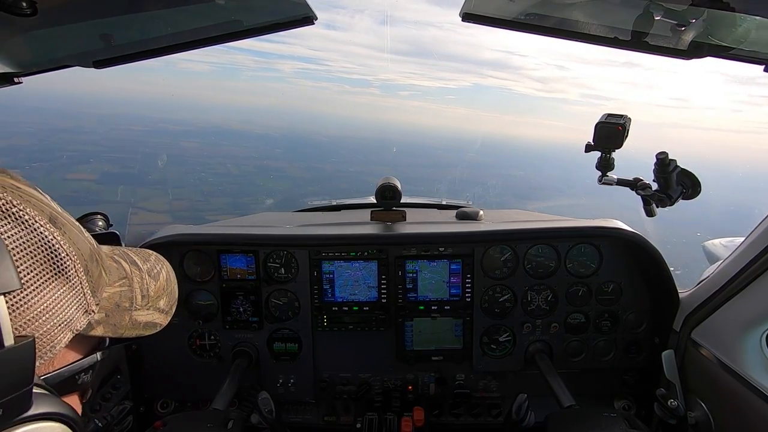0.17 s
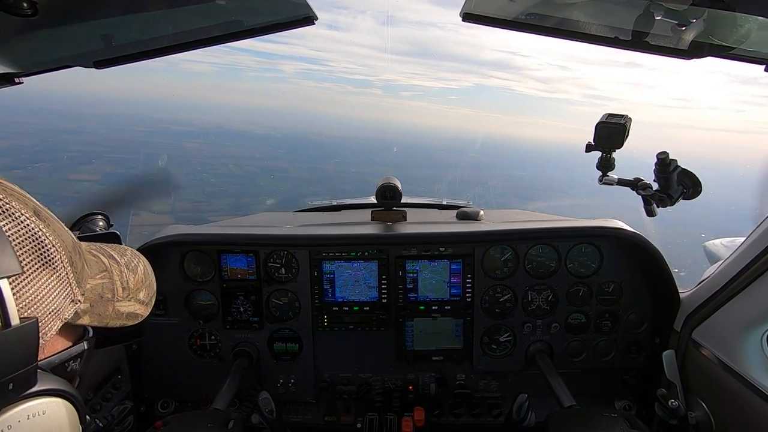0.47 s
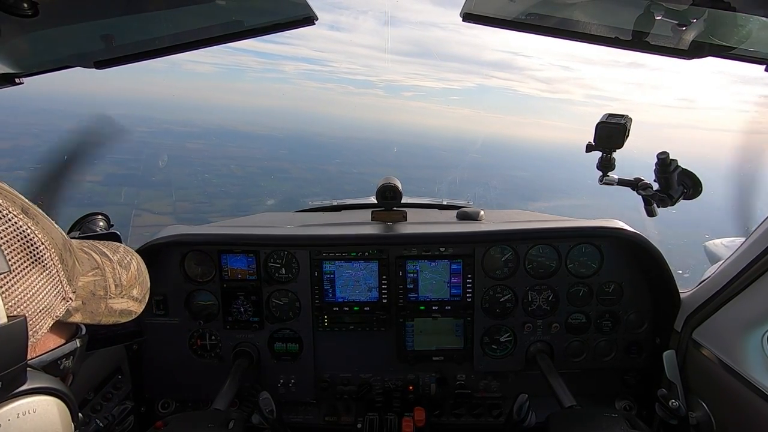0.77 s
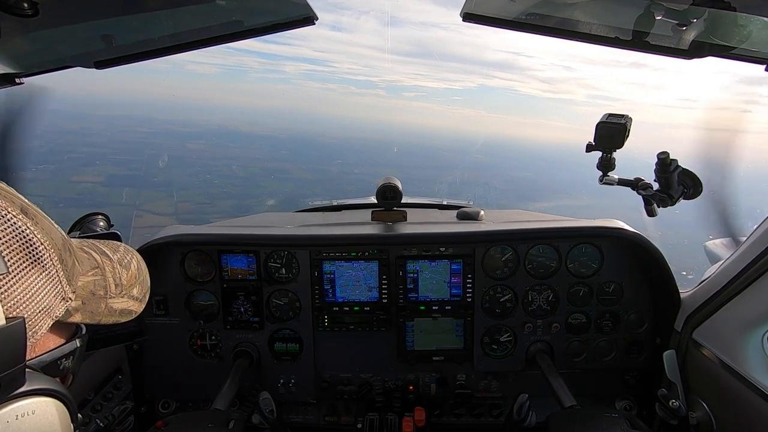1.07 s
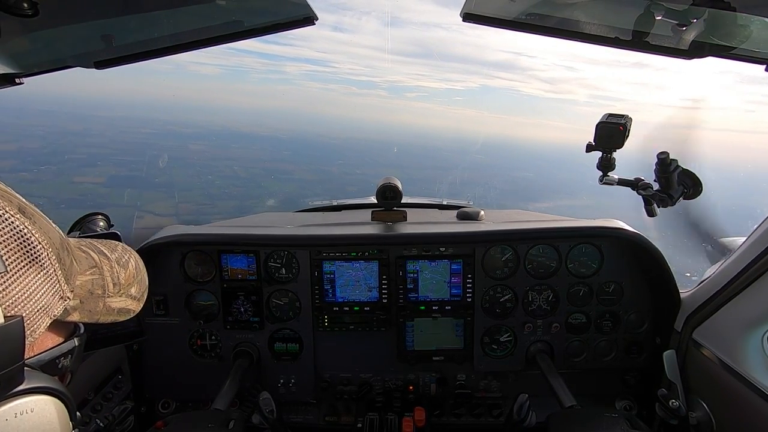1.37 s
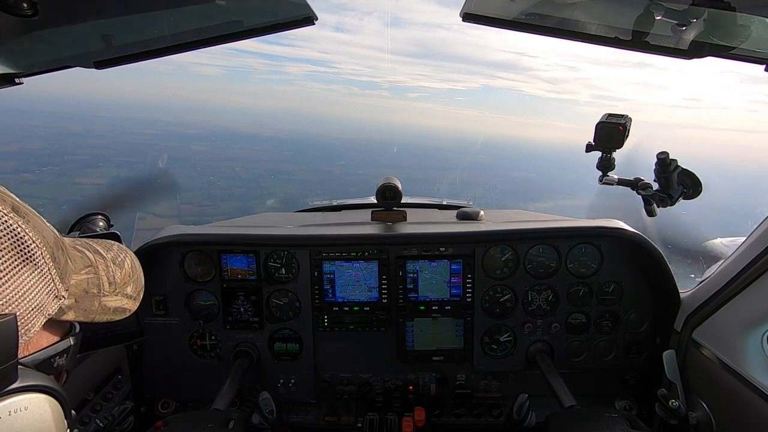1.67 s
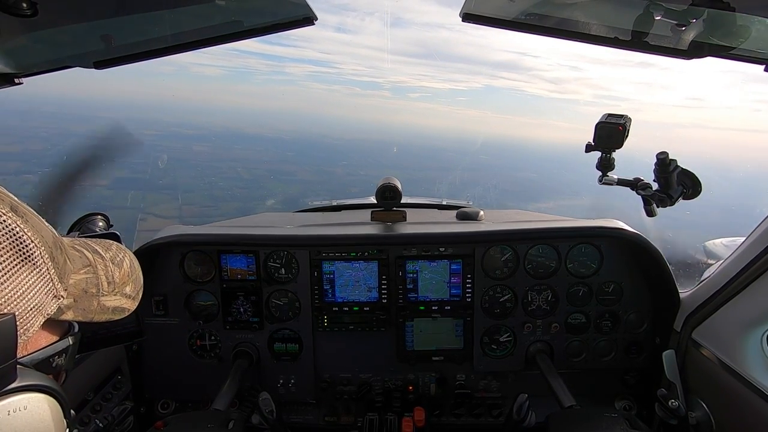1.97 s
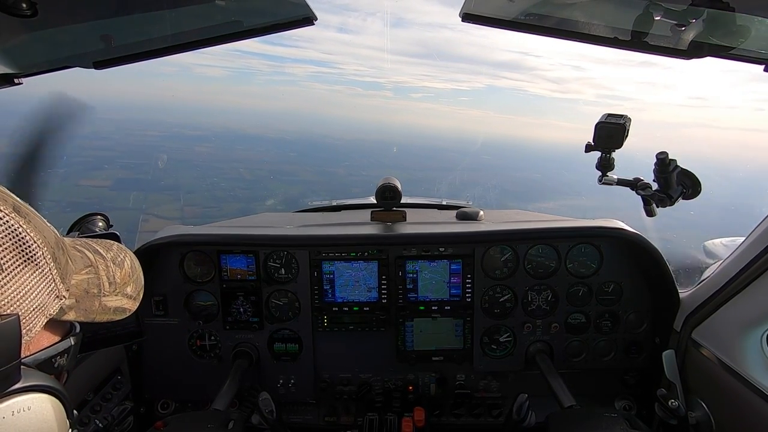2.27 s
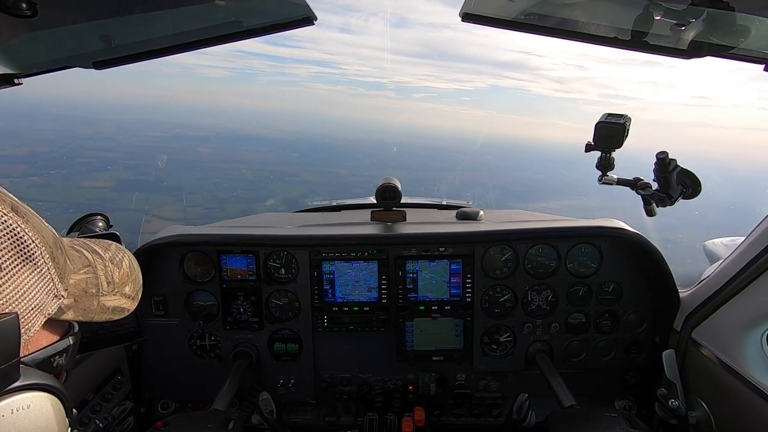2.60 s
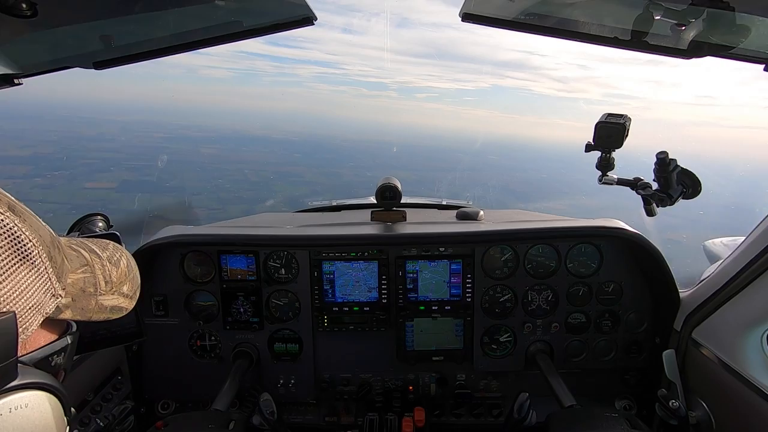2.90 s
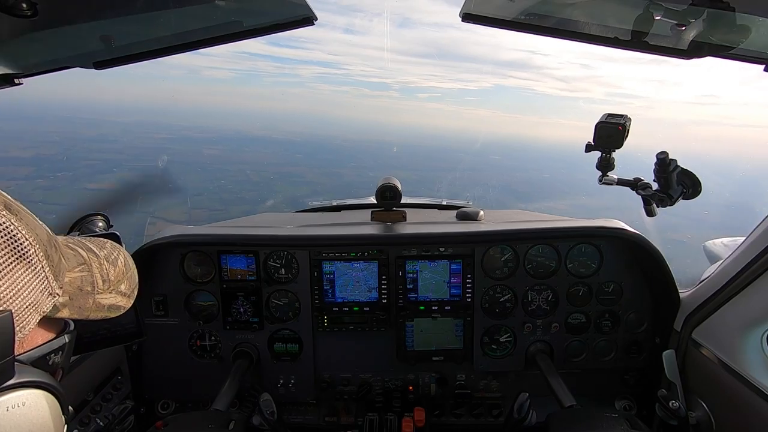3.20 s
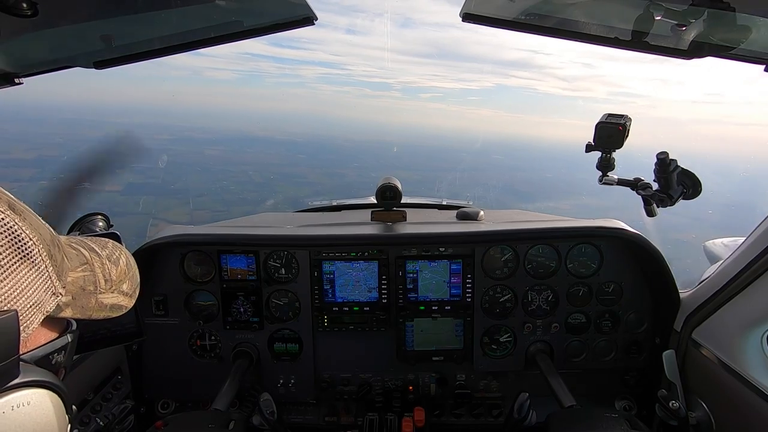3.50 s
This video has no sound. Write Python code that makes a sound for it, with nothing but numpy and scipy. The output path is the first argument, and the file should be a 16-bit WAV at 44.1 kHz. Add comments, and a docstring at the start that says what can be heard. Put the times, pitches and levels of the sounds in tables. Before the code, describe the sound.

A twin piston aircraft's engines and propellers drone throughout, about 3.6 seconds, low and steady near 116 Hz, with overtones swelling and fading as the nearly matched engines beat slowly. Deep uneven buffeting, including a surge around 1.2 seconds, and airframe rumble lie beneath. A dull air rush rings the panels of the small, close cabin. From about 2.6 seconds a faint, wavering high whine fades in.

```python
"""Cockpit of a small twin piston aircraft in cruise: two six-cylinder engines, three-blade propellers.
The drone is a stack of multiples of the engine cycle rate: four strong ones follow level curves,
weaker ones are tone pairs that beat slowly because the engines turn at almost the same speed.
Shaped noise makes deep buffeting, rumble and an air rush that rings the cabin panels and echoes.
Near the end a faint, thin whine of wavering sines fades in."""
import sys
import numpy as np
from scipy import signal
from scipy.fft import rfft, irfft
from scipy.io import wavfile

SR = 44100
rng = np.random.default_rng(int(sys.argv[2]) if len(sys.argv) > 2 else 0)


def transcribe(signal):
    """Save signal, clipped to [-1, 1], as a 16-bit WAV file at the path in sys.argv[1]."""
    frames = np.atleast_2d(signal).T
    limited = np.clip(frames, -1, 1)
    pcm = np.round(limited * 32767).astype(np.int16)
    wavfile.write(sys.argv[1], SR, pcm)


N = 160965
TIME = np.arange(N) / SR
FREQS = np.maximum(np.fft.rfftfreq(N, 1 / SR), 1)

# Swell shared by rush and rumble; only its departure from the mean counts.
# Each row: time in seconds, level in dB.
AIR_SWELL = [(0.03, -38), (0.31, -40.5), (0.95, -40), (1.64, -36.5), (1.68, -38), (2.56, -41),
             (3.15, -40.5), (3.41, -38), (3.49, -38.5), (3.52, -37), (3.6, -37.5)]


def from_db(db):
    """Decibels to amplitude gain."""
    return 10 ** (np.asarray(db) / 20)


def in_time(rows):
    """Interpolate (s, value) rows to every sample."""
    return np.interp(TIME, *np.transpose(rows))


def over_hz(points):
    """Interpolate (Hz, dB) points over log frequency."""
    hz, db = np.transpose(points)
    return np.interp(np.log(FREQS), np.log(hz), db)


def noise(density_db):
    """Steady Gaussian noise with the given level in dB per Hz."""
    white_spectrum = rfft(rng.standard_normal(N))
    return irfft(white_spectrum * from_db(density_db), N) * np.sqrt(SR / 2)


def wander(rate_hz, size=1024):
    """Slow random strength and phase: low-passed complex noise, rms 1."""
    hz = np.fft.fftfreq(size, TIME[-1] / size)
    spectrum = rng.standard_normal(size) + 1j * rng.standard_normal(size)
    slow = np.fft.ifft(spectrum / (1 + (hz / rate_hz) ** 2))
    slow = slow / np.sqrt(np.mean(abs(slow) ** 2))
    return np.interp(TIME, np.linspace(0, TIME[-1], size), slow)


def air_swell_db():
    """Shared swell of the air noise, in dB about its mean."""
    level_db = in_time(AIR_SWELL)
    return level_db - level_db.mean()


def buffeting():
    """Deepest rumble: low noise at unit rms, driven by its own level curve."""
    # Colour of the noise. Each row: frequency in Hz, relative density in dB.
    buffet_colour = [(8, -23.5), (19, -9), (27, -0.5), (36, -4), (50, -8), (90, -39.5), (400, -100)]
    # Each row: time in seconds, level in dB before trim.
    buffet_level = [(0.0, -50), (0.42, -42), (1.21, -43.5), (1.25, -28), (1.49, -38.5), (2.26, -41),
                    (2.3, -50), (3.01, -38), (3.1, -54), (3.31, -37), (3.64, -40), (3.65, -48)]
    trim_db = -.5
    deep = noise(over_hz(buffet_colour))
    return from_db(in_time(buffet_level) + trim_db) * deep / deep.std()


def rumble(swell_db):
    """Airframe rumble: low noise that follows the air swell."""
    # Each row: frequency in Hz, density in dB per Hz before trim.
    rumble_density = [(20, -84.5), (45, -60), (62, -55.5), (100, -54), (135, -53.5), (190, -58), (255, -55),
                      (325, -63), (395, -60.5), (560, -71), (900, -104), (2500, -140)]
    trim_db, swing = -2.5, 1  # swing: share of the swell in dB
    return from_db(trim_db + swing * swell_db) * noise(over_hz(rumble_density))


def air_rush(swell_db):
    """Air over the cabin: noise lifted at panel resonances, plus dulled reflections."""
    # Each row: frequency in Hz, density in dB per Hz before trim.
    rush_density = [(200, -70), (480, -68), (660, -68.5), (820, -72), (930, -69), (1300, -74),
                    (1800, -75.5), (2300, -80.5), (3000, -81.5), (3500, -82.5), (4050, -84.5), (4600, -93),
                    (5050, -96), (6200, -94.5), (7100, -101), (10000, -111), (15500, -118)]
    # Cabin resonances. Each row: centre in Hz, width in Hz, lift in dB.
    panels = [(668, 49, 4.5), (1080, 98, 1.5), (1536, 110, 2), (1757, 140, 3.5), (2010, 60, 1),
              (2573, 130, 5.5), (3027, 110, 5)]
    # Reflections off windscreen and cabin walls. Each row: delay in seconds, signed gain.
    echoes = [(.00349, .07), (.00669, .06), (.00697, .11), (.0123, -.05), (.01343, .07), (.01493, .05)]
    trim_db, swing = 0.04, 0.86  # swing: share of the swell in dB
    lining_cut_hz = 5500  # the cabin lining dulls the reflections

    panels_db = 0
    for hz, width_hz, lift_db in panels:
        panels_db = panels_db + lift_db / (1 + (2 * (FREQS - hz) / width_hz) ** 2)
    direct = noise(over_hz(rush_density) + panels_db)
    dull = irfft(rfft(direct) / (1 + (FREQS / lining_cut_hz) ** 6), N)
    reflected = sum(gain * np.roll(dull, round(delay_s * SR)) for delay_s, gain in echoes)
    return from_db(trim_db + swing * swell_db) * (direct + reflected)


def airflow():
    """Sum of the air noises; rush and rumble swell together, buffeting apart."""
    swell_db = air_swell_db()
    return air_rush(swell_db) + rumble(swell_db) + buffeting()


def whine():
    """Thin high sines with fast random pitch waver, faded in linearly."""
    # Each row: frequency in Hz, rms pitch waver in Hz, rms level in dB after the fade.
    whine_tones = [(8695, 18, -78), (10460, 3, -82), (11590, 30, -76.5), (12640, 16, -80),
                   (14490, 50, -77.5)]
    start_s, rise_s, waver_rate_hz = 2.64, .85, 80
    tones = 0
    for hz, waver_hz, db in whine_tones:
        pitch_hz = hz + waver_hz * np.sqrt(2) * np.real(wander(waver_rate_hz))
        phase = 2 * np.pi * np.cumsum(pitch_hz) / SR
        tones = tones + from_db(db) * np.sqrt(2) * np.sin(phase)
    return tones * np.clip((TIME - start_s) / rise_s, 0, 1)


def strong_lines(flutter_rate_hz):
    """Multiples 3, 6, 9, 12 of the cycle rate as (multiple, complex rms strength), on level curves."""
    # Each row of these four: time in seconds, level in dB before trim.
    bank_level = [(0.0, -34), (0.05, -33), (0.09, -39), (0.62, -34.5), (1.83, -28.5), (3.19, -37.5),
                  (3.38, -28.5), (3.53, -48), (3.56, -35), (3.65, -49)]  # half the firing rate
    blade_level = [(0.0, -24.5), (0.03, -22), (0.55, -20), (1.17, -23.5), (1.2, -26.5), (1.45, -21.5),
                   (1.53, -24), (2.53, -20), (3.22, -24), (3.27, -26), (3.47, -20.5), (3.55, -25),
                   (3.62, -20.5), (3.65, -17)]  # firing and blade rate
    throb_level = [(0.0, -25), (0.11, -25), (0.32, -25.5), (0.35, -32), (1.03, -47), (1.45, -26),
                   (1.76, -23), (1.86, -41), (2.08, -33), (2.37, -50), (2.77, -29), (3.09, -23),
                   (3.13, -28.5), (3.26, -41), (3.31, -29), (3.65, -36.5)]  # a fifth above the blade rate
    octave_level = [(0.0, -31.5), (0.11, -32), (0.33, -39), (0.41, -52), (0.46, -38.5), (1.05, -31.5),
                    (1.34, -31.5), (1.46, -50), (1.49, -37), (1.55, -48), (1.76, -30), (2.39, -35.5),
                    (2.47, -51), (2.78, -31), (3.03, -26.5), (3.37, -36), (3.46, -47), (3.65, -52)]  # an octave above the blade rate
    flutter = 0.013
    lines = []
    for multiple, level, trim_db in [(3, bank_level, 0.3), (6, blade_level, 0.5),
                                     (9, throb_level, -0.9), (12, octave_level, 0.53)]:
        strength = from_db(in_time(level) + trim_db)
        lines.append((multiple, strength * (1 + flutter * wander(flutter_rate_hz))))
    return lines


def beating_lines(flutter_rate_hz):
    """Weaker lines, one tone per engine: the pair beats at its multiple times the rate mismatch."""
    # Each row: multiple of the cycle rate (rounded in use), faster engine's level in dB,
    # slower engine's level in dB, moment in seconds when the two add up.
    orders = [(2, -49.5, -54.5, 2), (4, -38.5, -55.5, 2.3), (5, -51, -55.5, 0.52), (7, -42.5, -57.5, 1.1),
              (8, -46, -47, 1.6), (11, -51.5, -54, 0.54), (14, -51, -53.5, 0.19), (15, -46, -48.5, 0.025),
              (18, -45.5, -50.5, .38), (20, -51, -52.5, .08), (21, -47, -50, 0.5), (22, -55, -54.5, 0.28),
              (23, -64.5, -54, .04), (24, -47, -47, 0.24), (27, -53.5, -71, .14), (30, -63, -55.5, 0.056),
              (32, -62, -70.5, 0.12), (33, -56.5, -56.5, 0.12), (36, -59.5, -67, 0.38), (38, -58, -72, .07),
              (79.85, -63.5, -70, 0.032), (102.4, -65.5, -65.5, 0.033)]
    mismatch_hz = .08  # between the engines' cycle rates
    # Uneven combustion shakes the lines; propeller and cylinder-bank multiples (of 3) are steadier.
    steady_flutter, loose_flutter, flutter_per_multiple = .07, 0.68, 0.0066
    lines = []
    for order, fast_db, slow_db, together_s in orders:
        multiple = round(order)
        # half the mismatch ahead of the mean rate; its inverse lags by as much
        lead = np.exp(1j * np.pi * multiple * mismatch_hz * (TIME - together_s))
        flutter = loose_flutter if multiple % 3 else steady_flutter
        flutter = flutter + flutter_per_multiple * multiple
        fast = from_db(fast_db) * (lead + flutter * wander(flutter_rate_hz))
        slow = from_db(slow_db) / lead
        lines.append((multiple, fast + slow))
    return lines


def engines():
    """Drone: harmonics of the four-stroke cycle (two shaft turns), each at a random start phase."""
    # Mean of the two engines. Each row: time in seconds, cycle rate in Hz.
    cycle_rate = [(0, 19.325), (1.2, 19.318), (2.4, 19.376), (3.65, 19.385)]
    flutter_rate_hz = 3.3
    cycles = np.cumsum(in_time(cycle_rate)) / SR
    drone = 0
    for multiple, strength in strong_lines(flutter_rate_hz) + beating_lines(flutter_rate_hz):
        carrier = np.exp(2j * np.pi * (multiple * cycles + rng.random()))
        drone = drone + np.sqrt(2) * np.real(strength * carrier)
    return drone


def scene():
    """Mono sum as heard between the seats."""
    return (airflow() + whine() + engines())[None]


def record(dry):
    """Microphone: adds faint steady hiss, then a steep elliptic low-pass."""
    hiss_db_per_hz, cutoff_hz = -117, 15700
    # order 12, 0.1 dB ripple, 80 dB stopband
    low_pass = signal.ellip(12, .1, 80, cutoff_hz, fs=SR, output="sos")
    return signal.sosfilt(low_pass, dry + noise(hiss_db_per_hz))


dry = scene()
out = record(dry)
transcribe(out)
```